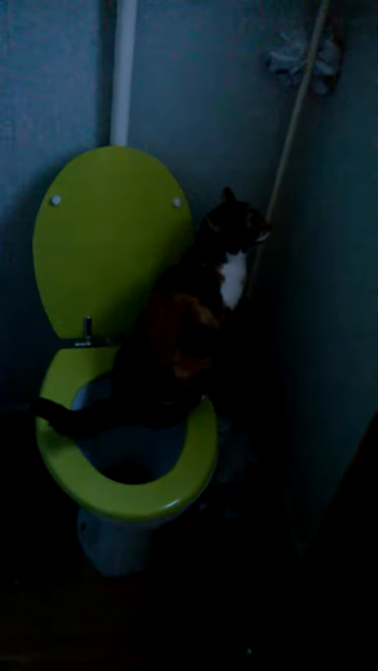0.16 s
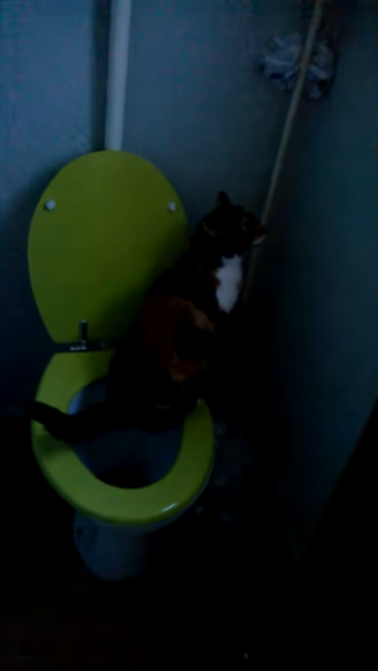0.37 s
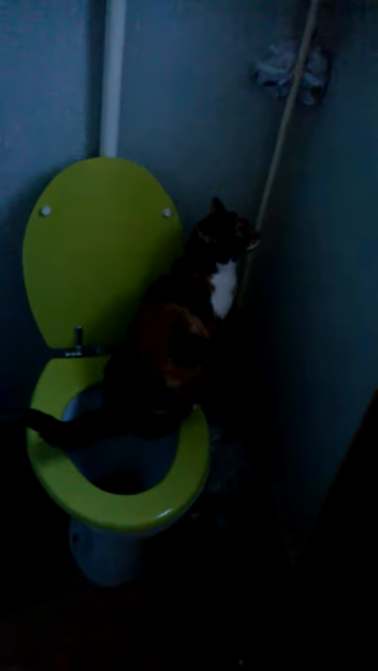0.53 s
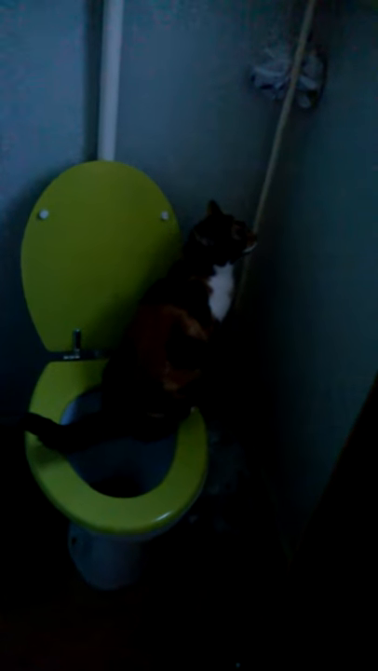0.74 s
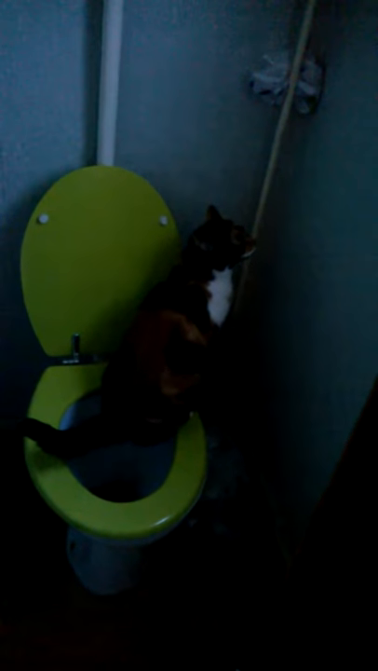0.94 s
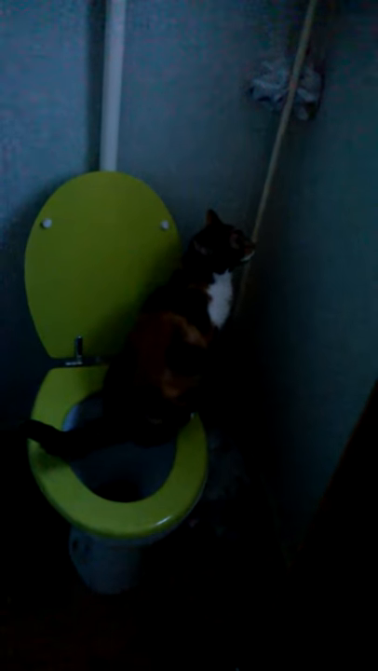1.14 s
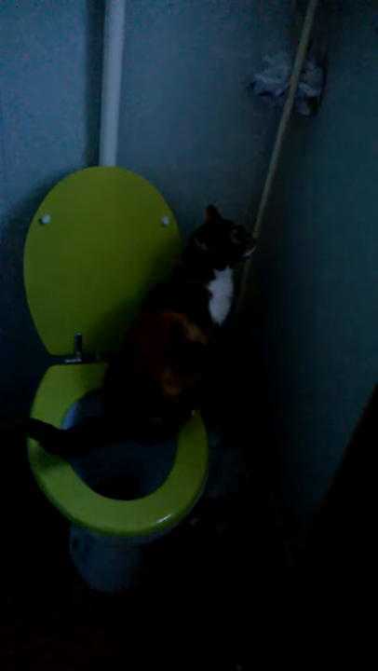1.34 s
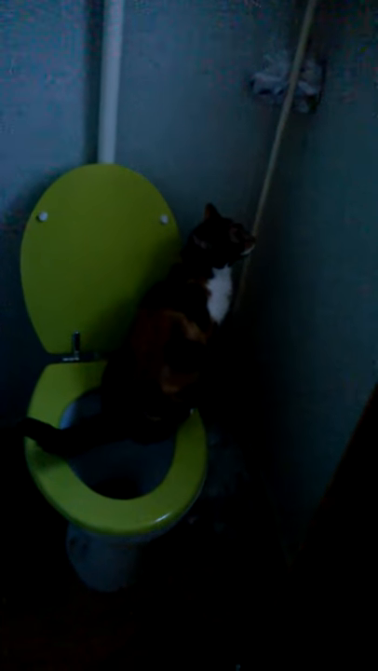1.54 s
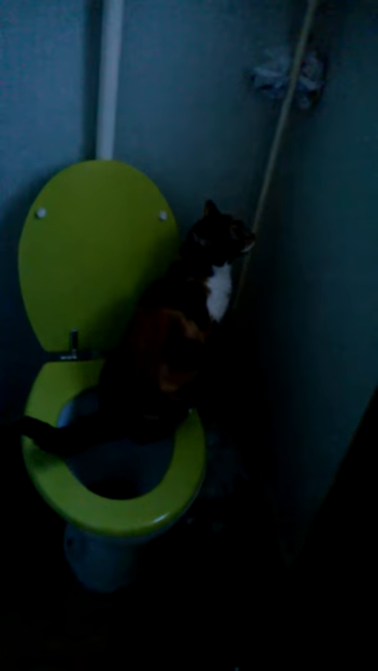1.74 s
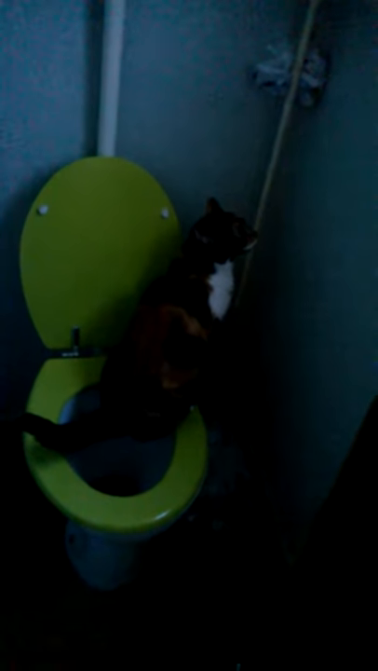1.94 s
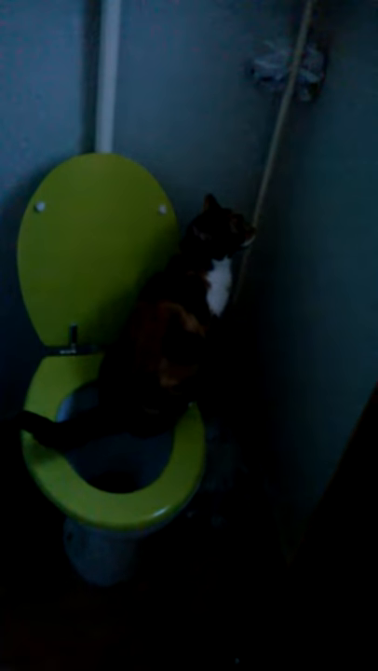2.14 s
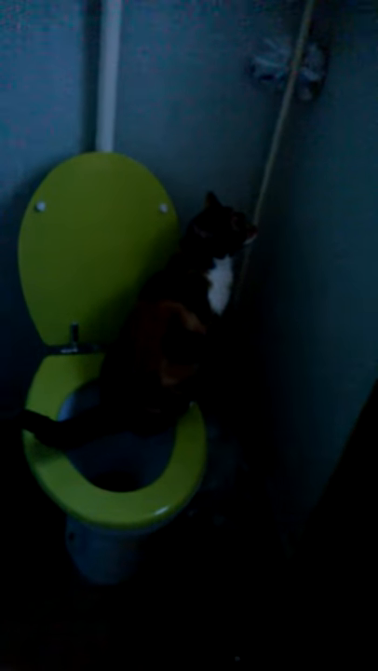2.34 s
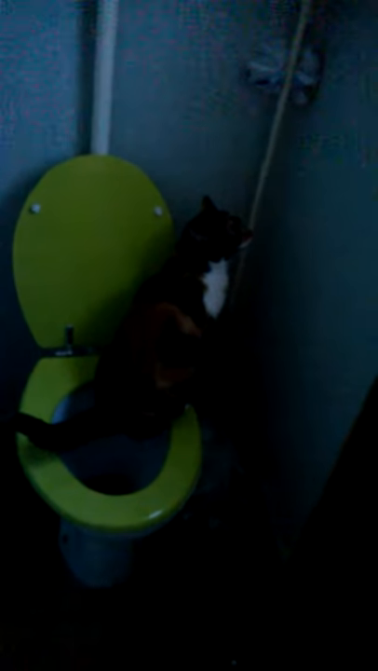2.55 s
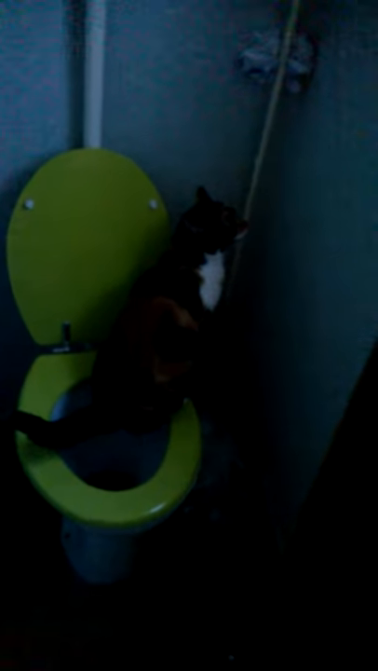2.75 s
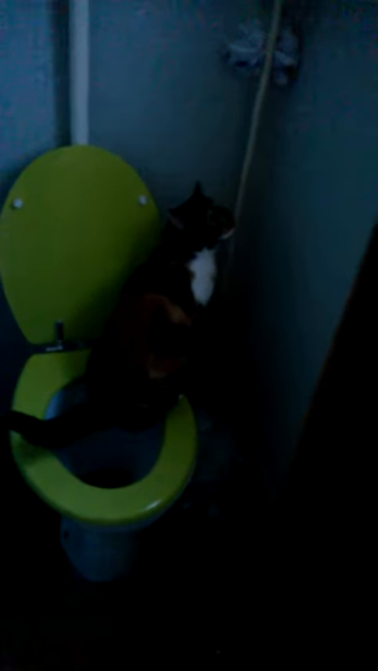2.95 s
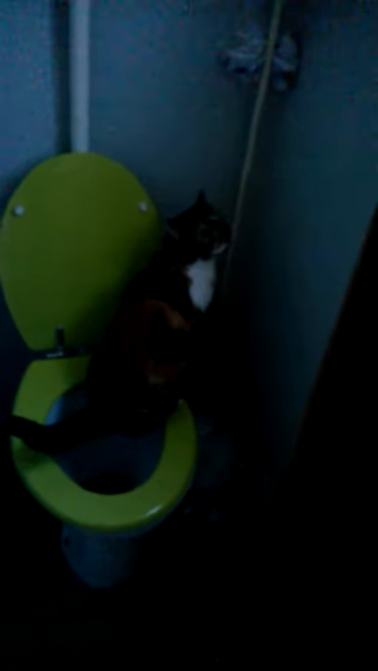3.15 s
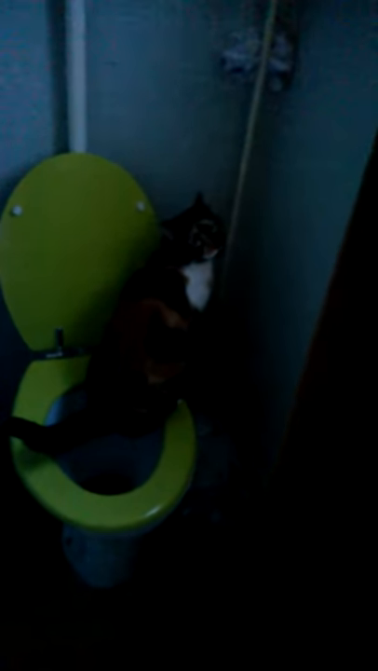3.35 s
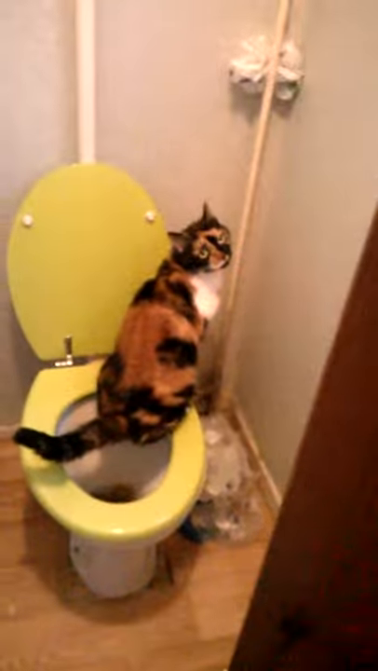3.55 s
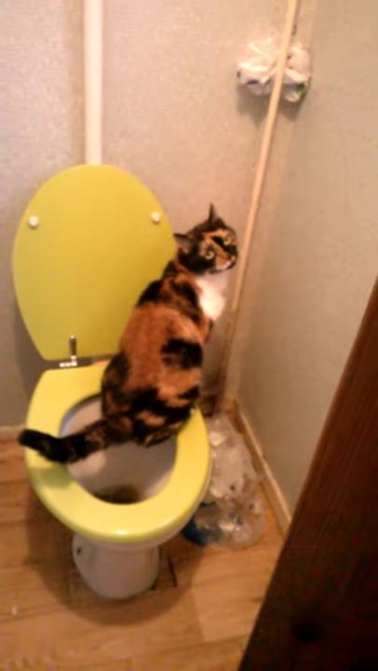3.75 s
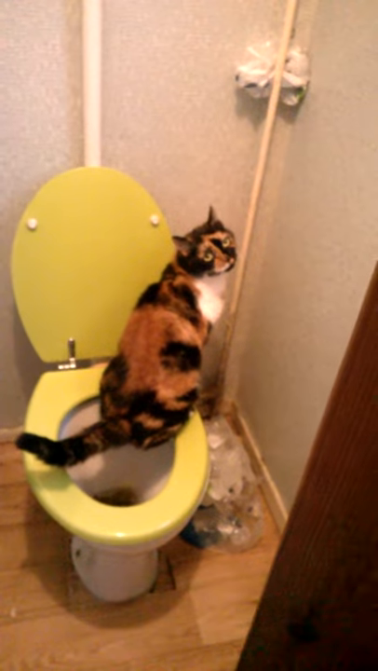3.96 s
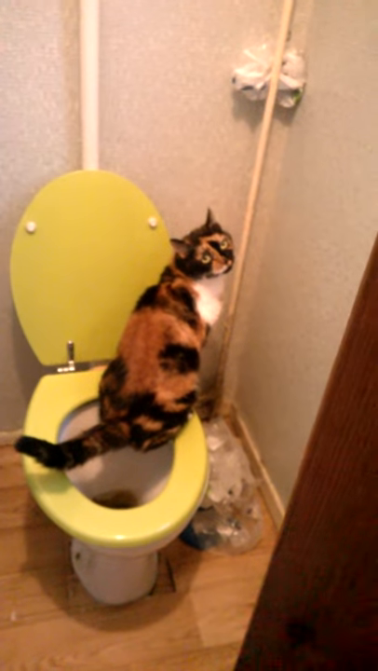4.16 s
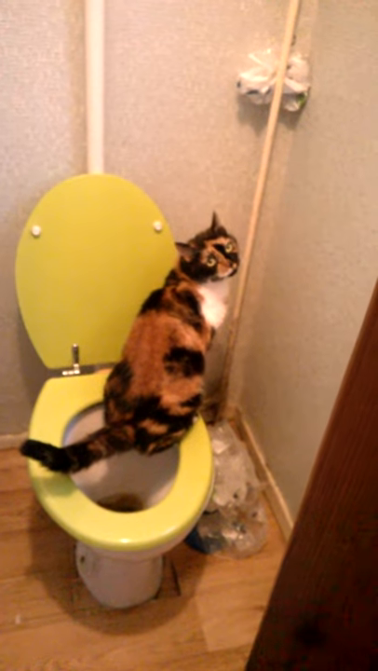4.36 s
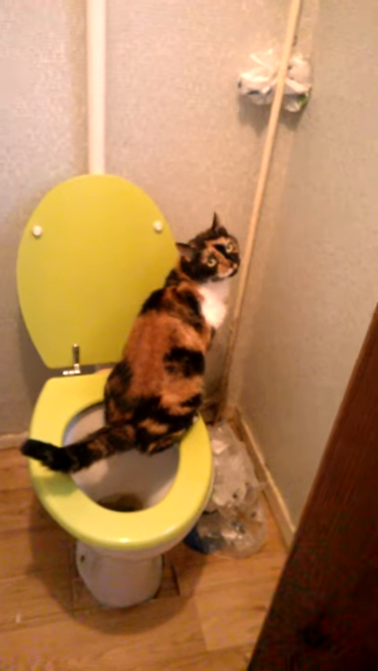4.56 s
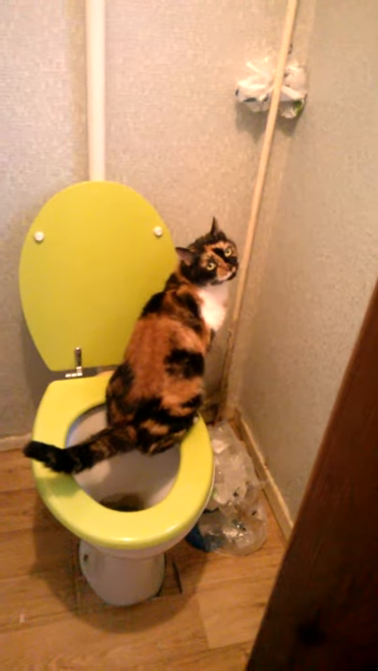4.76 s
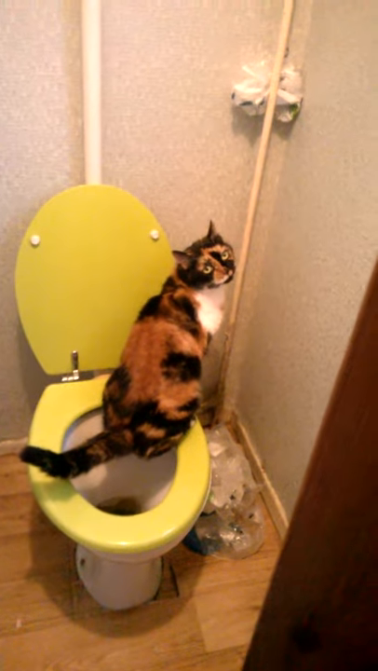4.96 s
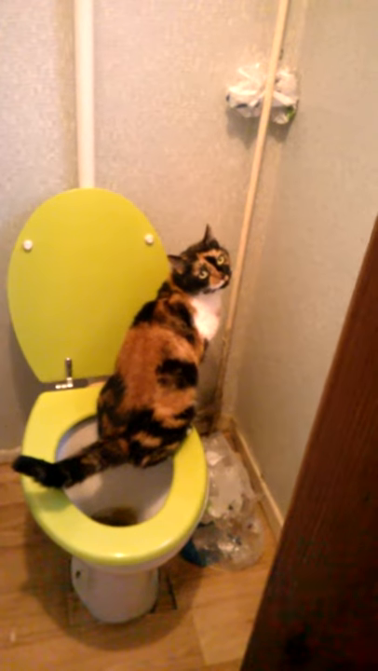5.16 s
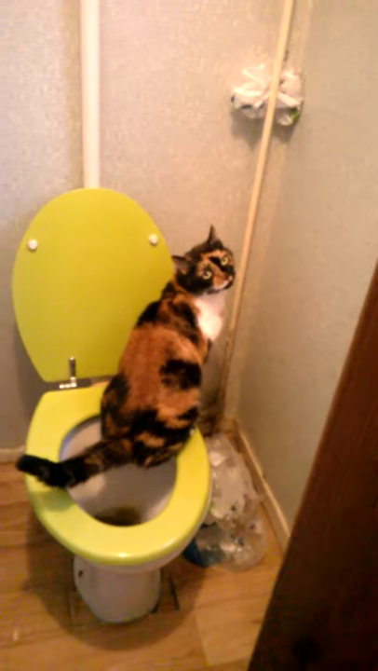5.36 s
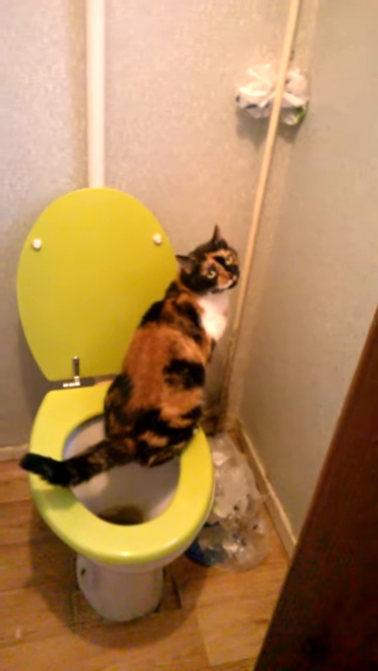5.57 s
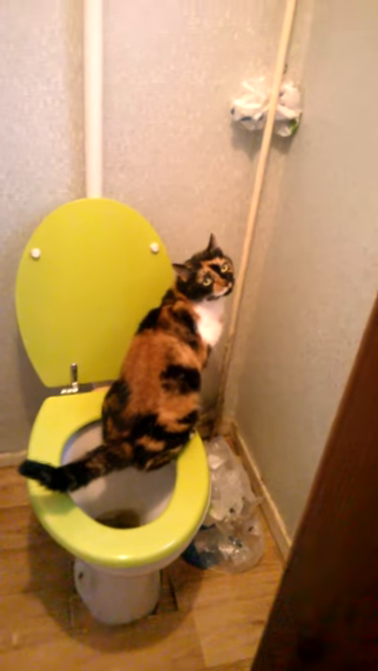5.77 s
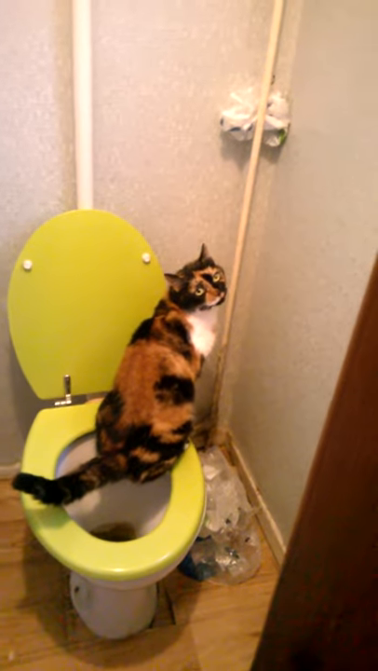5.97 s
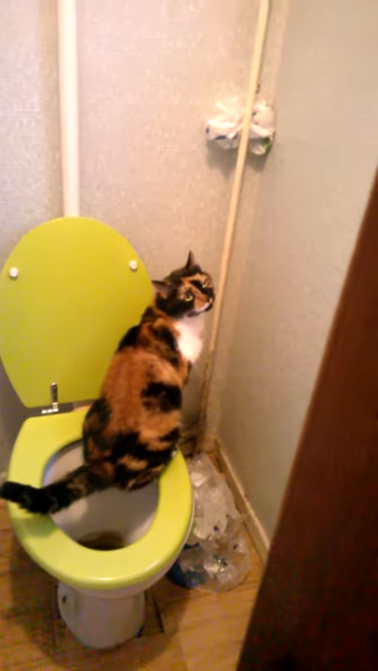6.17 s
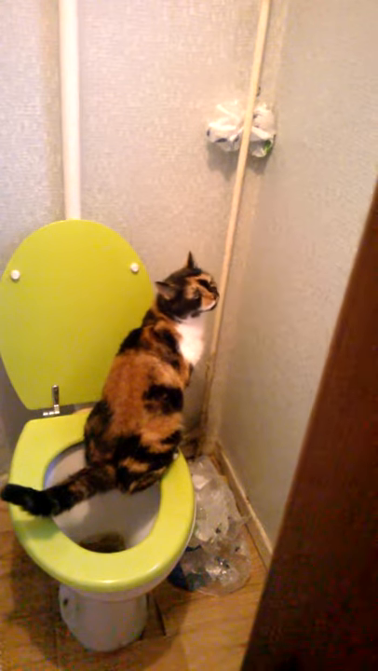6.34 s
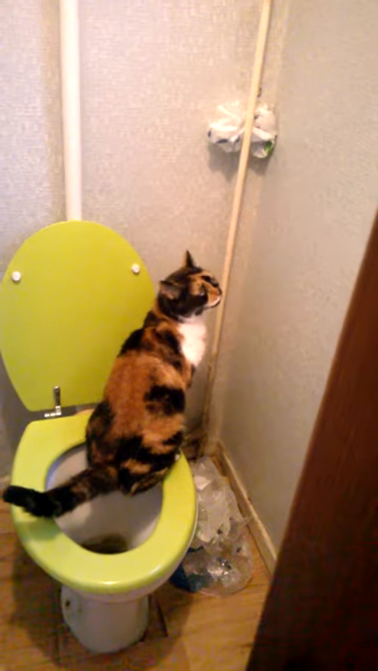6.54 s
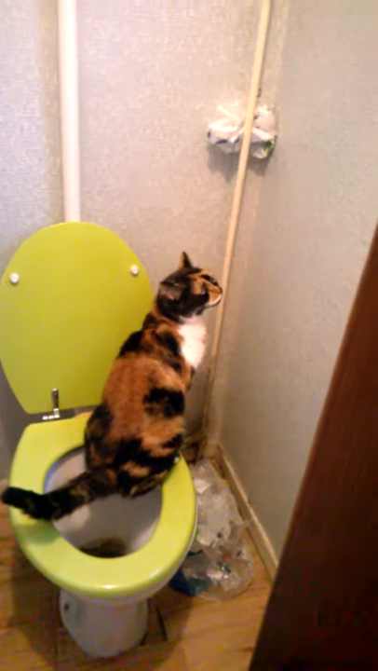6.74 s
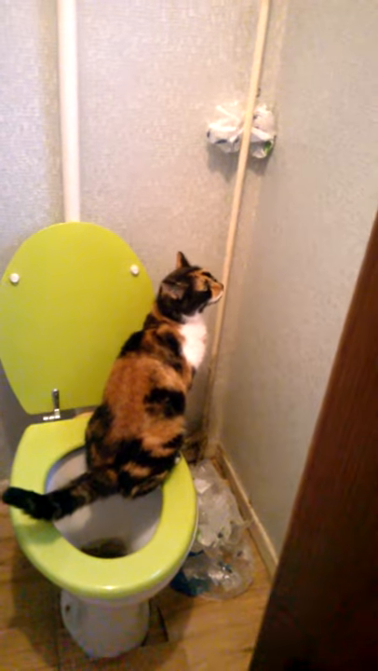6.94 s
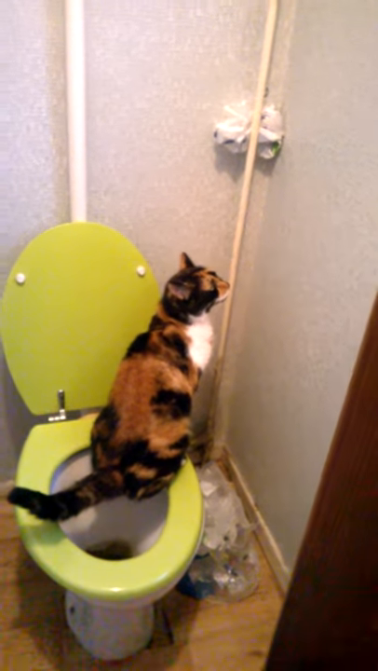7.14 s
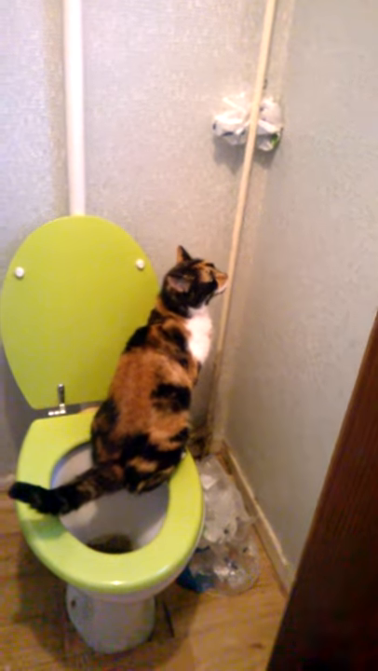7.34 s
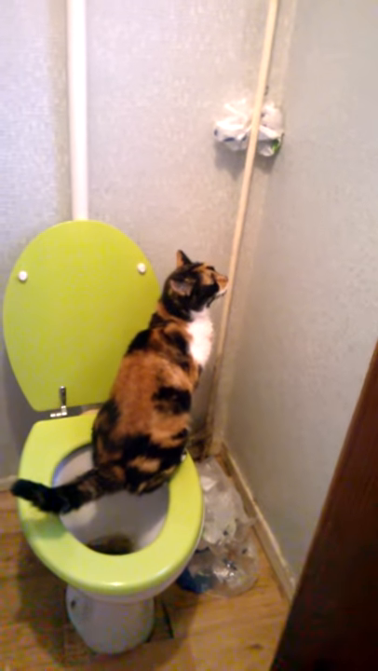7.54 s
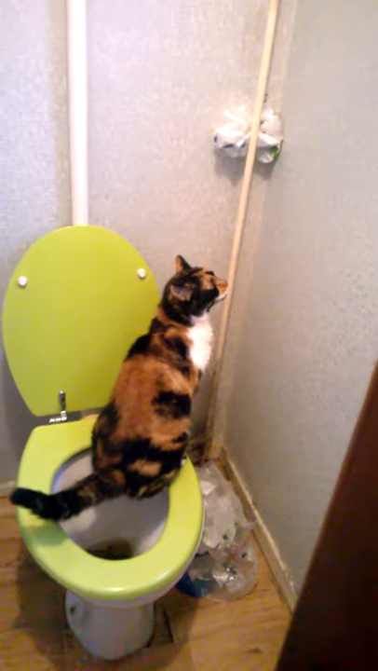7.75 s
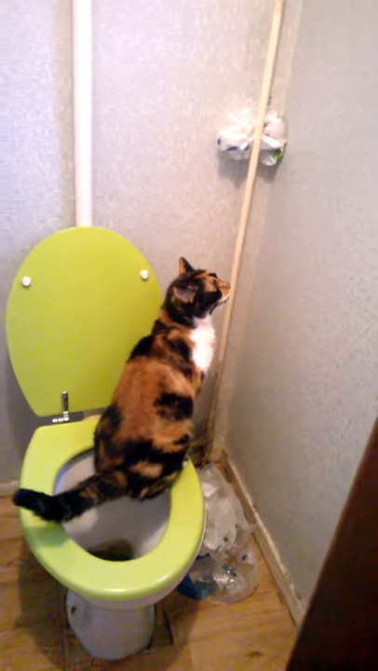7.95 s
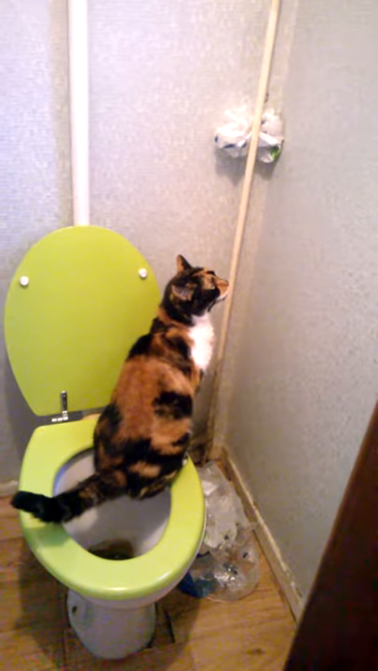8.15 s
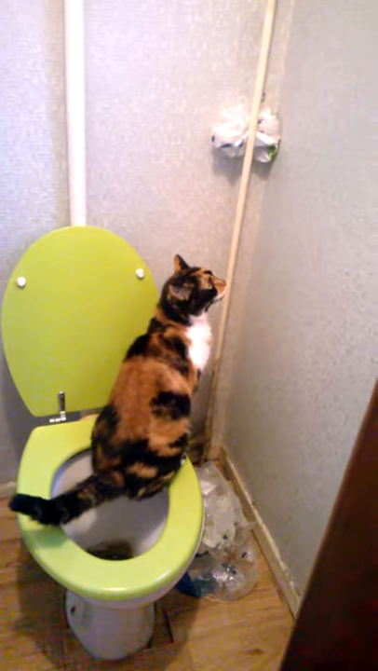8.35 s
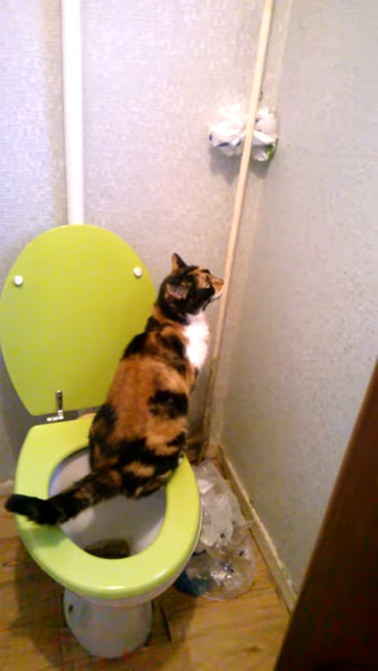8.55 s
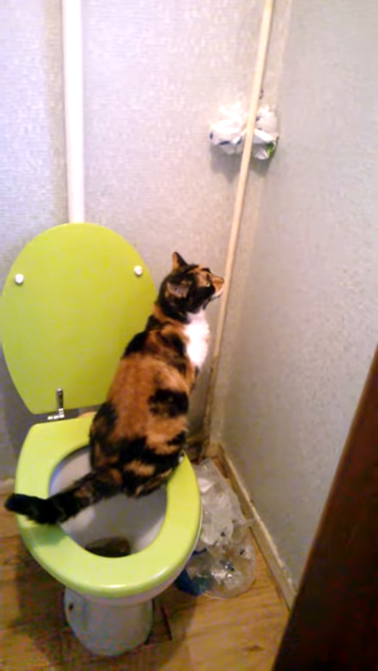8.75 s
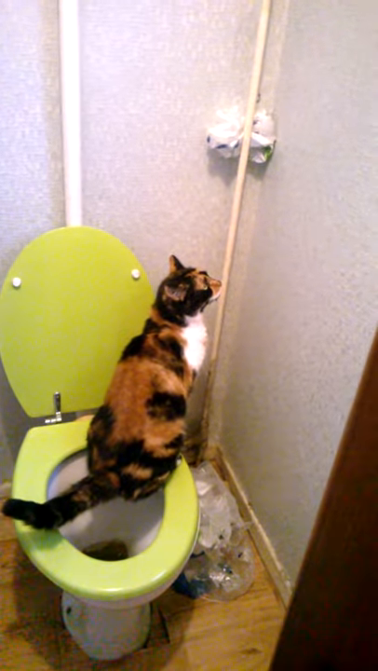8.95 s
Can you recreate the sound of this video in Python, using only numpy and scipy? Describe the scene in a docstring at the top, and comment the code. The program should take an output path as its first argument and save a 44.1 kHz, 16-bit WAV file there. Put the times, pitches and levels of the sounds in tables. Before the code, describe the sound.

A cat pees into a toilet with a steady, ringing trickle that thins to drips, interrupted by one sharp light switch click.

```python
"""First come watery plinks and a bump on the microphone: a phone, hand-held in a small tiled room,
where a cat's thin stream breaks into drops over the water of a toilet bowl. Some drops slap and spray;
each traps a bubble whose short rising note rings the air in the bowl and then the room.
Midway a light switch clicks down and up near the phone, which hisses and rumbles underneath."""
import sys
import numpy as np
from scipy import signal
from scipy.fft import rfft, irfft, next_fast_len
from scipy.io import wavfile
from scipy.ndimage import uniform_filter1d

SR = 44100
rng = np.random.default_rng(int(sys.argv[2]) if len(sys.argv) > 2 else 0)


def wav_out(sig):
    """Save sig, one row per channel (or a flat mono array), as 16-bit PCM at SR to the path in sys.argv[1]."""
    wavfile.write(sys.argv[1], SR, np.round(np.clip(np.atleast_2d(sig).T, -1, 1) * 32767).astype(np.int16))


N = 397076
FRAME, SHORT, BLOCK, TAIL = 256, 1024, 2048, 8192  # buffer lengths [samples]
HZ = np.fft.rfftfreq(TAIL, 1 / SR)


# Clear bubbles in the bowl: (time [s], level before dips [dB], nominal pitch [Hz])
BUBBLE_NOTES = [(0.0, -38, 747), (.006, -53.5, 8150), (.018, -40, 738), (.037, -44, 2340), (.055, -48, 670),
                (.076, -56, 5350), (.094, -46.5, 770), (0.12, -57, 1370), (0.134, -58, 8400),
                (.175, -63, 8190), (.187, -47, 736), (0.206, -45, 1740), (.21, -44, 4880),
                (.285, -54, 2680), (0.29, -42, 1260), (.318, -44.5, 837), (.342, -49.5, 2140),
                (0.405, -42.5, 5680), (.408, -51.5, 1760), (.461, -52.5, 5980), (.525, -47, 4700),
                (.546, -54, 8300), (.556, -48.5, 1180), (0.616, -48.5, 2940), (0.625, -58, 8300),
                (.671, -52, 730), (.739, -48.5, 2690), (.74, -54, 1360), (.768, -63, 7170),
                (.786, -58, 735), (.823, -54, 1506), (.824, -59, 5900), (.97, -50, 726),
                (1.003, -37.5, 740), (1.012, -58, 2520), (1.029, -50, 1240), (1.078, -47, 750),
                (1.083, -38.5, 1150), (1.135, -63, 10140), (1.136, -55.5, 5630), (1.188, -50.5, 3260),
                (1.263, -43.5, 680), (1.264, -65, 10140), (1.306, -57.5, 8500), (1.317, -47, 4730),
                (1.389, -34.5, 783), (1.39, -36.5, 1150), (1.481, -47, 1260), (1.485, -41.5, 2720),
                (1.489, -46.5, 710), (1.535, -50.5, 5900), (1.666, -53, 6200), (1.707, -44, 815),
                (1.707, -55, 7800), (1.72, -45.5, 1270), (1.73, -51, 1970), (1.795, -43.5, 735),
                (1.818, -43, 728), (1.868, -52, 1720), (1.869, -51, 8300), (1.885, -55, 8800),
                (1.927, -50.5, 4600), (1.937, -41.5, 1900), (1.977, -46, 685), (2.041, -51.5, 1640),
                (2.088, -46.5, 6930), (2.098, -48, 807), (2.112, -59, 10500), (2.147, -57.5, 1520),
                (2.151, -58, 2745), (2.222, -43.5, 668), (2.277, -48, 5000), (2.391, -53.5, 8850),
                (2.339, -49.5, 576), (2.423, -47.5, 755), (2.447, -45.5, 1298), (2.49, -58, 2100),
                (2.524, -45.5, 900), (2.552, -38, 3890), (2.575, -46.5, 827), (2.569, -54, 7670),
                (2.602, -62, 10000), (2.627, -58, 2260), (2.628, -44, 780), (2.633, -55, 6400),
                (2.656, -49, 2280), (2.676, -47.5, 5980), (2.784, -50, 2500), (2.797, -52.5, 1750),
                (2.857, -55, 4360), (2.863, -52.5, 715), (2.895, -47.5, 770), (2.943, -65, 8570),
                (2.944, -61, 2480), (2.947, -38, 803), (3.077, -53.5, 1250), (3.137, -43.5, 1550),
                (3.136, -43.5, 8100), (3.152, -55, 3650), (3.155, -49, 758), (3.178, -49, 2410),
                (3.238, -47, 720), (3.247, -50, 3500), (3.269, -54.5, 8900), (3.269, -37.5, 740),
                (3.293, -56, 7610), (3.423, -43, 750), (3.441, -46, 4560), (3.452, -50, 7600),
                (3.537, -42.5, 2080), (3.56, -47.5, 2980), (3.579, -52, 6960), (3.627, -31.5, 757),
                (3.65, -54, 8550), (3.741, -47.5, 1245), (3.747, -45.5, 740), (3.777, -39.5, 713),
                (3.82, -63, 6450), (3.858, -41, 735), (3.895, -51, 734), (3.915, -53, 5230),
                (3.98, -40, 703), (3.991, -44, 1490), (4.007, -63, 10100), (4.01, -48, 4940),
                (4.015, -64, 2090), (4.019, -37.5, 700), (4.095, -42, 4750), (4.182, -49, 2990),
                (4.183, -51.5, 726), (4.198, -60.5, 6960), (4.201, -44, 1552), (4.281, -46.5, 710),
                (4.316, -51, 1320), (4.347, -45, 750), (4.36, -54.5, 1530), (4.45, -64, 760),
                (4.484, -49.5, 5600), (4.515, -49, 1374), (4.542, -54, 764), (4.561, -46, 3620),
                (4.565, -48, 5930), (4.587, -50.5, 7530), (4.63, -46.5, 730), (4.681, -43, 4380),
                (4.692, -44.5, 2040), (4.696, -36, 732), (4.754, -59.5, 8700), (4.755, -41.5, 760),
                (4.807, -52, 1475), (4.827, -50, 2090), (4.905, -51.5, 6000), (4.957, -47.5, 740),
                (4.97, -46, 1480), (4.992, -51, 723), (5.035, -53, 3510), (5.05, -49, 2680),
                (5.075, -47.5, 850), (5.143, -52, 2420), (5.145, -43.5, 725), (5.275, -52, 720),
                (5.372, -45.5, 2320), (5.375, -42, 680), (5.49, -54.5, 7530), (5.526, -40, 700),
                (5.53, -40.5, 1410), (5.546, -52, 566), (5.547, -41.5, 727), (5.561, -46, 2400),
                (5.6, -49.5, 730), (5.674, -63, 5100), (5.707, -44, 717), (5.719, -61, 7600),
                (5.776, -39.5, 700), (5.776, -60, 6560), (5.828, -48, 1430), (5.83, -49, 740),
                (5.864, -58, 4790), (5.919, -42, 760), (5.923, -47.5, 1385), (5.96, -62.5, 6800),
                (5.963, -46.5, 2620), (5.962, -50, 1295), (5.994, -51.5, 750), (6.038, -50.5, 2170),
                (6.039, -41.5, 1226), (6.089, -54, 5760), (6.154, -46.5, 1620), (6.176, -50, 10250),
                (6.211, -49.5, 1770), (6.234, -42, 726), (6.301, -49, 584), (6.302, -43.5, 780),
                (6.335, -49, 1225), (6.383, -49, 2350), (6.417, -48.5, 1610), (6.42, -49, 760),
                (6.525, -57.5, 6470), (6.526, -52, 2470), (6.634, -50, 686), (6.746, -49, 1340),
                (6.806, -49.5, 5400), (6.806, -46.5, 713), (6.808, -46.5, 2250), (6.841, -52, 3660),
                (6.864, -49, 1950), (6.878, -43.5, 740), (6.897, -55, 5100), (6.897, -51.5, 1370),
                (6.963, -41.5, 1363), (6.964, -58, 2470), (6.966, -46, 770), (6.994, -48, 1032),
                (7.02, -60, 3950), (7.066, -51, 1850), (7.067, -44.5, 670), (7.073, -50, 4430),
                (7.167, -61, 10000), (7.222, -46, 1525), (7.227, -49, 2440), (7.231, -48.5, 750),
                (7.321, -52, 2000), (7.325, -46, 810), (7.326, -52, 5300), (7.334, -58, 9600),
                (7.356, -45.5, 3330), (7.361, -43, 733), (7.387, -41.5, 724), (7.411, -47.5, 762),
                (7.416, -47.5, 6830), (7.441, -45, 3940), (7.446, -41.5, 710), (7.483, -54, 8100),
                (7.513, -51.5, 6690), (7.535, -54, 8300), (7.551, -58.5, 712), (7.574, -50, 7700),
                (7.619, -63.5, 2480), (8.014, -52, 2104), (8.02, -54.5, 3430), (8.113, -57.5, 5550),
                (8.128, -56.5, 7850), (8.412, -64.5, 2360), (8.465, -60.5, 1235), (8.726, -57.5, 5430),
                (8.916, -67.5, 9200), (8.948, -53.5, 3590)]
def bubbles():
    """Single trapped bubbles, starting just under nominal pitch, reach the microphone via bowl and room."""
    times, db, hz = np.transpose(BUBBLE_NOTES)
    cycles = 5.19 * amp(2.76 * rng.standard_normal(len(times))) * (hz / 1000) ** 0.13
    path = bowl(open_db=-12.0) * room(len(times))
    notes = irfft(path * rfft(plinks(.93 * hz, cycles, rise=0.082), TAIL), TAIL)
    onset_rms = np.sqrt(np.mean(notes[:, :SHORT] ** 2, axis=1))
    return place(times, notes * (amp(db) / onset_rms)[:, None])


def plinks(hz, cycles, rise):
    """One row per bubble: a damped sine with a soft start, rising in pitch as it nears the surface."""
    turns = np.arange(SHORT) / SR * hz[:, None]
    age = turns / cycles[:, None]
    return np.sin(2 * np.pi * turns * (1 + rise * age)) * np.exp(-age) * (1 - np.exp(-turns / 0.75))


# Drops that slap the water and throw spray: (time [s], peak before dips [dB])
SLAPS = [(0.119, -46), (.205, -41), (.406, -42), (0.524, -45), (0.616, -42), (.739, -46), (1.136, -42.5),
         (1.259, -56), (1.478, -32), (1.666, -48), (1.935, -36), (2.113, -46), (2.656, -45), (2.797, -42),
         (2.858, -54), (3.077, -42), (3.136, -46), (3.441, -41), (3.991, -42.5), (4.182, -46),
         (4.231, -47.5), (4.561, -35), (4.685, -43), (4.969, -45.5), (5.373, -47), (5.707, -49),
         (5.963, -52), (6.038, -41), (6.336, -48), (6.382, -52), (6.525, -57), (6.745, -54), (6.806, -39),
         (6.896, -41), (6.994, -50), (7.156, -37), (7.325, -38.5), (8.013, -46.5), (8.107, -65),
         (8.412, -57), (8.726, -63), (8.948, -53)]
def splashes(rise_s=.004, t60_s=0.038, low_hz=2800, top_hz=9500):
    """Each slap on the surface is a puff of treble noise, heard through bowl and room."""
    times, db = np.transpose(SLAPS)
    t = np.arange(SHORT) / SR
    slap = amp(-60 * t / t60_s) * (1 - np.exp(-t / rise_s)) * rng.standard_normal((len(times), SHORT))
    band = (1j * HZ / (low_hz + 1j * HZ)) ** 2 / (1 + 1j * HZ / top_hz) ** 4
    heard = irfft(bowl(open_db=-15.5) * room(len(times)) * band * rfft(slap, TAIL), TAIL)
    return place(times, amp(db)[:, None] * heard / np.abs(heard).max(axis=1, keepdims=True))


# Base gains of the bubble crowds in the bowl: (time [s], deep [dB], fine [dB])
CROWD_LEVELS = [(0.12, -50.5, -53.5), (0.54, -57, -52), (0.74, -62.5, -56.5), (0.86, -59, -63),
                (1.01, -53, -56), (1.24, -52, -52), (1.6, -49.5, -58), (1.98, -52.5, -52.5),
                (2.29, -53.5, -60.5), (3.12, -46.5, -51), (3.6, -46, -52.5), (4.43, -51.5, -58.5),
                (5.23, -50.5, -58.5), (5.76, -50, -57), (6.64, -51.5, -57.5), (6.85, -50.5, -55),
                (7.45, -49, -54), (7.7, -89, -74)]
def stream():
    """Bubbles large and small, and spray; the pool churns low in step with the deep crowd."""
    deep, fine = curves(CROWD_LEVELS)
    churn_colour = [(70, -40), (120, -10.5), (190, -1.0), (280, -8.0), (550, -6.0), (800, -38.5)]
    churn = amp(-20.5) * deep * noise(churn_colour)
    small = deep * crowd(count=600, centre_hz=1147, octaves=0.599, cycles=3.1, scatter_db=4.5)
    tiny = fine * crowd(count=1500, centre_hz=3210, octaves=0.6, cycles=3.5, scatter_db=5.5)
    finest = amp(-9.5) * fine * crowd(count=500, centre_hz=7000, octaves=0.35, cycles=3.8, scatter_db=7.5)
    return level_dips() * (bubbles() + splashes() + small + tiny + finest) + churn


def crowd(count, centre_hz, octaves, cycles, scatter_db):
    """Small bubbles at random times, pitches and strengths, heard through bowl and room at rms 1."""
    pitch_draw, strength_draw = rng.standard_normal((count, 2)).T
    hz = np.clip(centre_hz * 2 ** (octaves * pitch_draw), 520, 11000)
    strength = amp(scatter_db * np.clip(strength_draw, -3, 1.8))[:, None]
    notes = strength * plinks(hz, np.full(count, cycles), rise=0.125)
    patter = place(rng.uniform(0, N / SR, count), notes)
    blocks = np.pad(patter, (0, -N % BLOCK)).reshape(-1, BLOCK)  # each block draws a room path
    heard = irfft(rfft(blocks, TAIL) * bowl(open_db=-15.5) * room(len(blocks)), TAIL)
    return unit(place(np.arange(len(blocks)) * BLOCK / SR, heard))


# Brief dips in the heard level of the water sound: (time [s], length [s], depth [dB])
LEVEL_DIPS = [(0.133, 0.016, -11.5), (0.16, 0.03, -8), (0.257, 0.025, -9), (0.791, 0.027, -11),
              (0.853, 0.038, -11.5), (0.918, 0.05, -9.5), (1.229, 0.026, -8), (1.335, 0.037, -9),
              (1.579, 0.072, -7), (1.77, 0.02, -9), (1.9, 0.022, -9.5), (2.185, 0.021, -9.5),
              (2.297, 0.034, -5), (2.353, 0.036, -8), (2.39, 0.024, -7), (2.741, 0.035, -6.5),
              (2.828, 0.03, -5.5), (3.055, 0.015, -9.5), (3.195, 0.035, -9.5), (3.692, 0.049, -15.5),
              (3.918, 0.052, -10.5), (4.127, 0.038, -4), (4.261, 0.022, -8.5), (4.413, 0.025, -13),
              (4.491, 0.027, -8.5), (4.881, 0.062, -4.5), (5.303, 0.064, -10.5), (5.687, 0.026, -3.5),
              (6.089, 0.066, -15), (6.467, 0.054, -8.5), (7.107, 0.092, -9.5), (7.28, 0.033, -12)]
def level_dips(sink_share=0.97, return_s=0.0077):
    """The heard level of the water sound dips briefly, then returns quickly."""
    t = np.arange(N) / SR
    db = sum(depth_db * np.clip((t - start) / (sink_share * length), 0, 1) * (t < start + length)
             for start, length, depth_db in LEVEL_DIPS)
    return amp(uniform_filter1d(db, int(return_s * SR) + 1))


# Resonances of the air above the water: (frequency [Hz], width [Hz], gain [dB])
BOWL_MODES = [(649.5, 9.5, -9), (733.1, 31.7, 2.5), (828, 2.6, -9), (981, 9, -24), (1135, 18, -3.5),
              (1253, 18, -2), (1360, 16, -5.5), (1513, 12.4, -2), (1571, 22.3, -7.5), (1767, 53, -3),
              (2103, 30.5, -9), (2195, 18, -6.5), (2462, 19.3, -7.5), (3120, 56, -16.5), (3226, 12.3, -10),
              (3770, 74, -16), (4170, 40, -22.5), (5120, 20, -14), (5320, 45, -17.5), (5600, 49, -17)]
def bowl(open_db):
    """The bowl's air resonates; sound also escapes through the seat, with the top treble rolled off."""
    modes = sum((-1) ** k * amp(db) * 1j * HZ * width / (hz * hz - HZ ** 2 + 1j * HZ * width)
                for k, (hz, width, db) in enumerate(BOWL_MODES))
    escape = amp(open_db) * 1j * HZ / (450 + 1j * HZ) / (1 + 1j * HZ / 11000) ** 3
    return modes + escape


# Rocker contacts: (time [s], strength [dB], relative thud [dB], thud swell [s], thud tilt [dB/octave])
CONTACTS = [(3.338, -31.5, -38, 0.0097, 0), (3.35, -13, -21.5, 0.01, -7.5), (3.471, -33, -33, .01, 0),
            (3.483, -18, -15.5, 0.027, 5)]
# The plastic switch housing: (frequency [Hz], level [dB], time to fall 60 dB [s])
HOUSING_MODES = [(996, -6.5, 0.032), (1730, -1, 0.058), (2630, -18, 0.0358), (3810, -16.5, 0.027),
                 (5560, -13, 0.0412), (7160, -10, 0.033), (8490, -16, 0.047), (11780, -18, 0.017)]
# The hollow wall behind it: (frequency [Hz], level [dB], time to fall 60 dB [s])
WALL_MODES = [(123.3, -6, 0.25), (191.2, 0.5, 0.31), (255.7, -6, 0.21)]
def light_switch():
    """Near the microphone the rocker slips, then snaps; its housing rings and the wall thuds."""
    t = np.arange(2 * TAIL) / SR
    pivot_hz = WALL_MODES[1][0]
    clicks, thuds = [], []
    for _, db, thud_db, swell_s, tilt_db in CONTACTS:
        snap = amp(8.5 - 60 * t / 0.021) * rng.standard_normal(len(t))
        housing = ringing(HOUSING_MODES, t, scatter_db=2.5)
        clicks.append(amp(db) * (1 - np.exp(-t / 0.0014)) * (housing + snap))
        # the wall panel does not ring evenly
        rattle = amp(152 * uniform_filter1d(rng.standard_normal((len(WALL_MODES), len(t))), SHORT))
        thud = sum(gain * amp(tilt_db * np.log2(mode[0] / pivot_hz)) * ringing([mode], t, scatter_db=0.5)
                   for gain, mode in zip(rattle, WALL_MODES))
        thuds.append(amp(db + thud_db) * (1 - np.exp(-t / swell_s)) * thud)
    near_path = 1 + amp(-7.5) * (room(len(clicks)) - 1)  # close up, the echoes are weaker
    band = (1j * HZ / (600 + 1j * HZ)) ** 2 / (1 + 1j * HZ / 11000) ** 3
    heard = irfft(rfft(clicks, TAIL) * near_path * band, TAIL)
    times = [contact[0] for contact in CONTACTS]
    return place(times, heard) + place(times, np.array(thuds))


# Decay of the tiled room: (frequency [Hz], time to fall 60 dB [s])
ROOM_DECAY = [(300, 0.37), (750, 0.31), (1500, 0.21), (4000, 0.05), (12000, 0.2)]
# Echoes at the microphone: (frequency [Hz], gain against the direct path [dB])
ECHO_GAIN = [(300, 2), (750, 3), (1500, 6), (4000, 9.5), (12000, 9.5)]
def room(count, spots=48):
    """Paths from random spots to the microphone: direct sound, then echoes building off the near tiles."""
    hz = np.fft.rfftfreq(FRAME, 1 / SR)[:, None]
    t = np.arange(2 * TAIL // FRAME + 1) * FRAME / 2 / SR
    envelope = amp(-60 * (t / along(ROOM_DECAY, hz)) ** 1.465) * (1 - np.exp(-t / 0.0033))
    envelope *= amp(along(ECHO_GAIN, hz)) / np.linalg.norm(envelope, axis=1, keepdims=True)
    real, imag = rng.standard_normal((2, spots, *envelope.shape))
    echoes = signal.istft((real + 1j * imag) * envelope / FRAME, SR, nperseg=FRAME)[1]
    return 1 + rfft(echoes, TAIL)[rng.integers(spots, size=count)]


# Fingers on the phone's case: (time [s], strength [dB], relative tick [dB], pitch [Hz])
FINGER_BUMPS = [(.037, -18, -5, 660), (2.628, -38.5, -4, 125), (4.739, -45, -12, 257),
                (6.069, -49, -10, 255)]
# Rumble of the hand holding it: (time [s], level [dB])
HAND_RUMBLE = [(0.0, -69.5), (2.48, -69.5), (2.63, -56), (2.78, -69), (5.94, -72), (6.07, -66.5),
               (9.0, -68.5)]
# Colour of its circuit hiss: (frequency [Hz], relative density [dB])
HISS_COLOUR = [(60, -10), (100, -8), (200, -11), (450, -13.5), (900, -13.5), (2100, -19.5), (5200, -17.5),
               (8500, -26), (12000, -26.5), (15800, -28)]
def phone():
    """Right at the microphone: finger bumps on the case, hand rumble and circuit hiss."""
    times, db, tick_db, hz = np.transpose(FINGER_BUMPS)[..., None]
    t = np.arange(BLOCK) / SR
    push = np.sin(2 * np.pi * hz * t) * np.exp(-t * hz / 0.65)
    tick = amp(tick_db - 60 * t / 0.014) * uniform_filter1d(rng.standard_normal(push.shape), size=5)
    rumble_colour = [(8, -28.5), (20, 2.5), (50, -3.5), (75, -15.0), (120, -50), (300, -79)]
    rumble = curves(HAND_RUMBLE)[0] * noise(rumble_colour)
    hiss = amp(-69) * noise(HISS_COLOUR)
    return place(times[:, 0], amp(db) * (push + tick)) + rumble + hiss


def ringing(modes, t, scatter_db):
    """Struck modes die away, at slightly new strengths on every strike."""
    return sum(amp(db + rng.normal(0, scatter_db) - 60 * t / t60) * np.sin(2 * np.pi * hz * t)
               for hz, db, t60 in modes)


def noise(colour):
    """Noise of rms 1, coloured by (frequency [Hz], level [dB]) points."""
    size = next_fast_len(N)
    gain = amp(along(colour, np.fft.rfftfreq(size, 1 / SR)))
    return unit(irfft(rfft(rng.standard_normal(size)) * gain, size)[:N])


def place(times, sounds):
    """Sum short sounds at their times."""
    at = np.round(np.asarray(times) * SR).astype(int)[:, None] + np.arange(sounds.shape[1])
    return np.bincount(at.ravel(), sounds.ravel(), N + 2 * TAIL)[:N]


def curves(rows):
    """One gain per sample for each dB column; silence after the last row."""
    times, *columns = np.transpose(rows)
    return [amp(np.interp(np.arange(N) / SR, times, db, right=-120)) for db in columns]


def along(points, hz):
    """Interpolate (frequency [Hz], value) points on a log axis."""
    knots_hz, values = np.transpose(points)
    return np.interp(np.log(hz + 1), np.log(knots_hz + 1), values)


def amp(db):
    return 10 ** (np.asarray(db) / 20)


def unit(x):
    return x / np.sqrt(np.mean(x ** 2, axis=-1, keepdims=True) + 1e-20)


def scene():
    """Bowl, switch and handling noise at one microphone, in mono."""
    return (stream() + light_switch() + phone())[None]


def record(dry, top_hz=15830):
    """The phone keeps nothing above its band limit."""
    size = next_fast_len(N + TAIL)
    passband = np.fft.rfftfreq(size, 1 / SR) < top_hz
    return irfft(rfft(dry, size) * passband, size)[:, :N]


dry = scene()
out = record(dry)
wav_out(out)
```